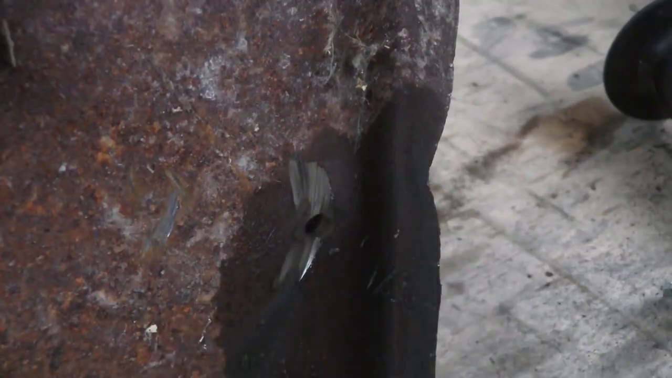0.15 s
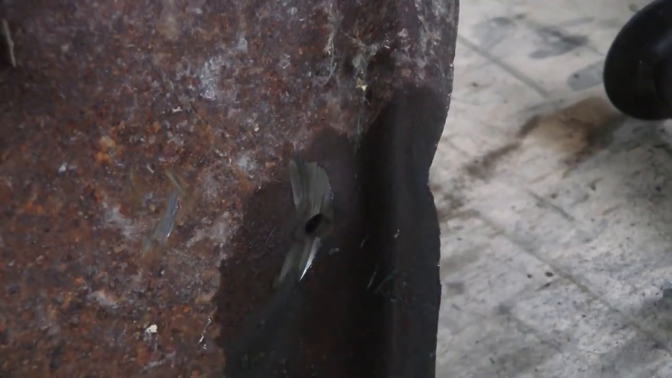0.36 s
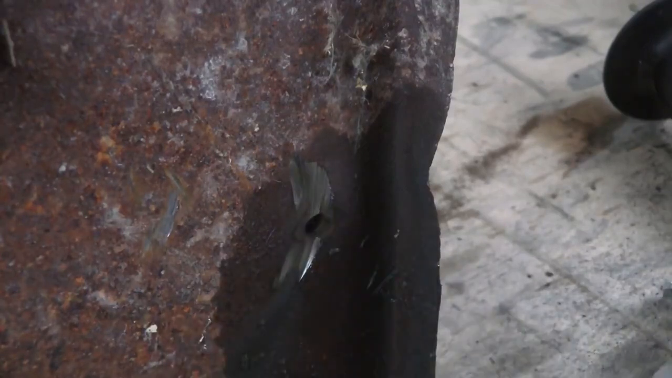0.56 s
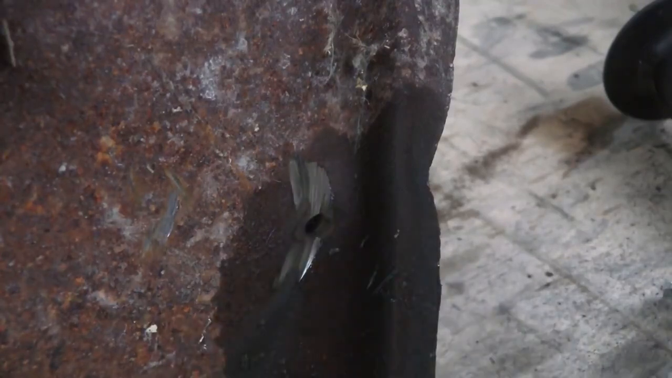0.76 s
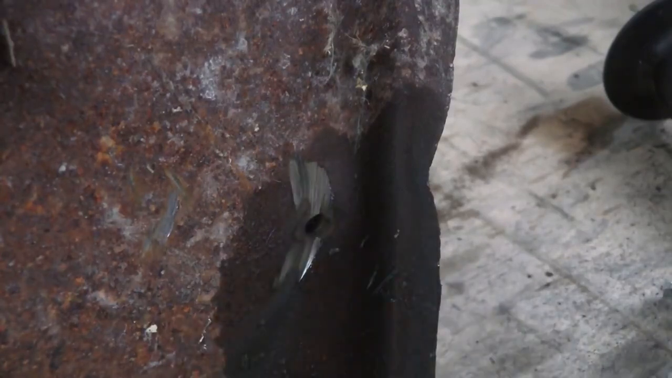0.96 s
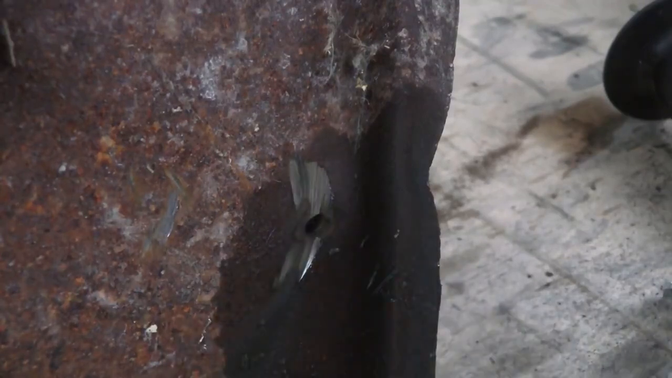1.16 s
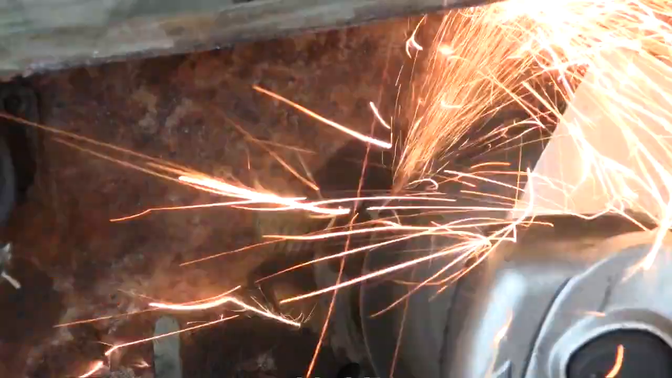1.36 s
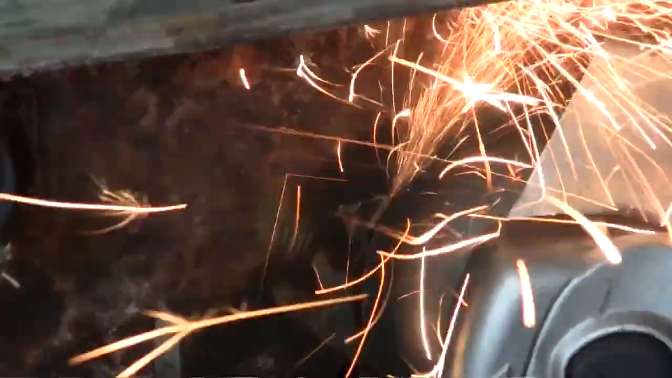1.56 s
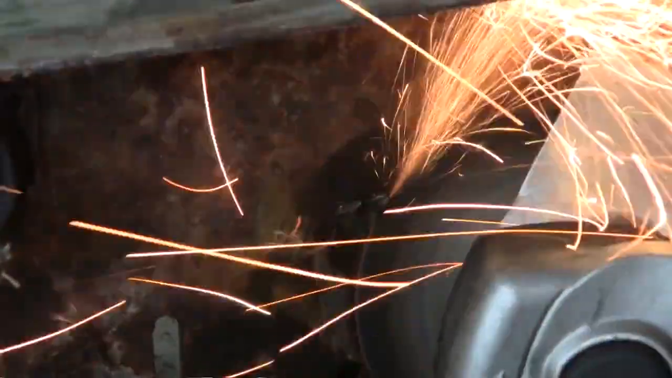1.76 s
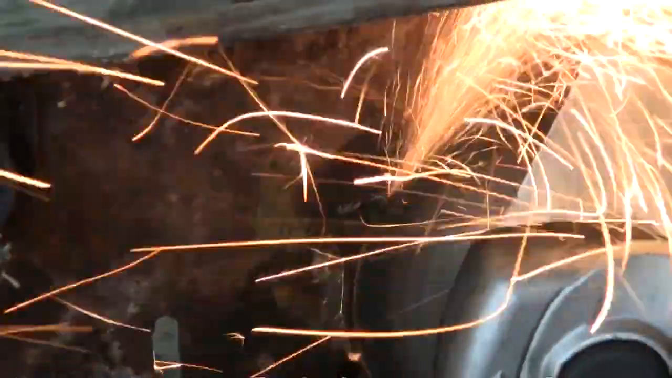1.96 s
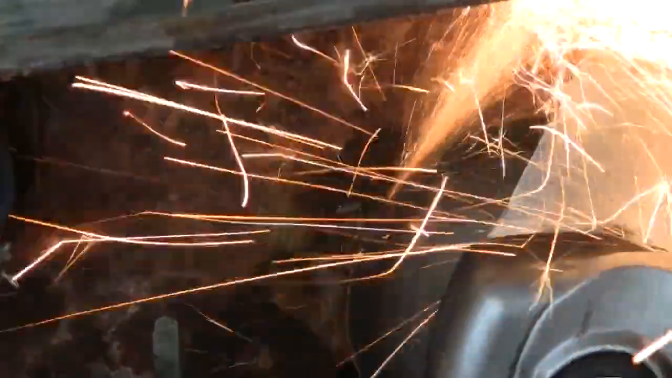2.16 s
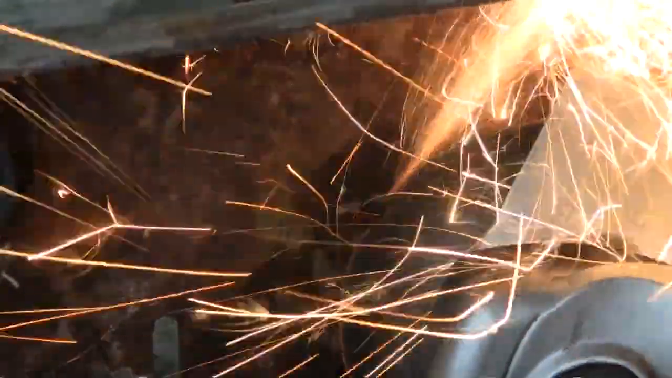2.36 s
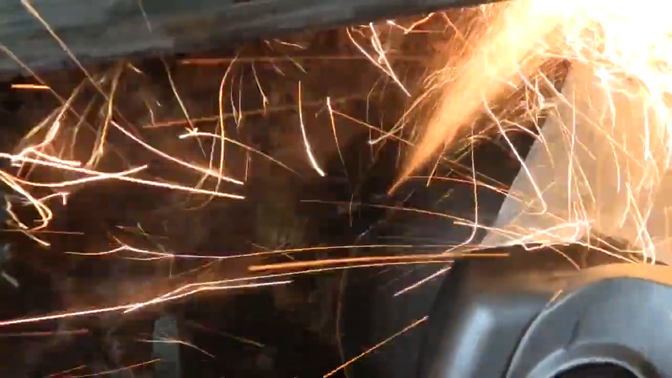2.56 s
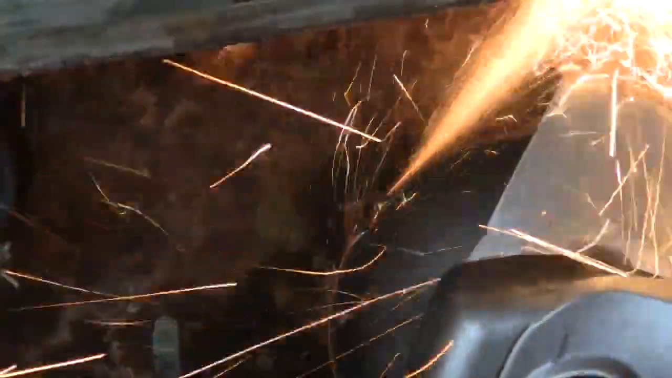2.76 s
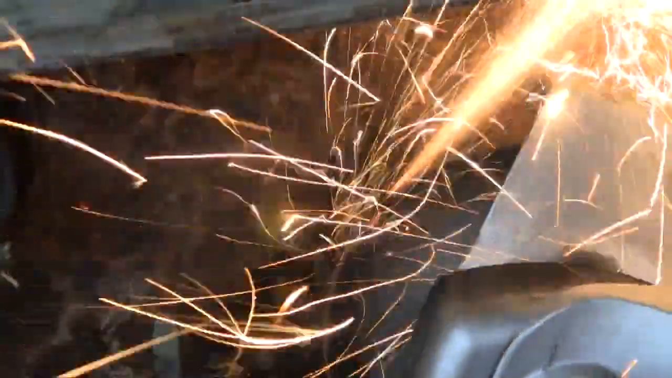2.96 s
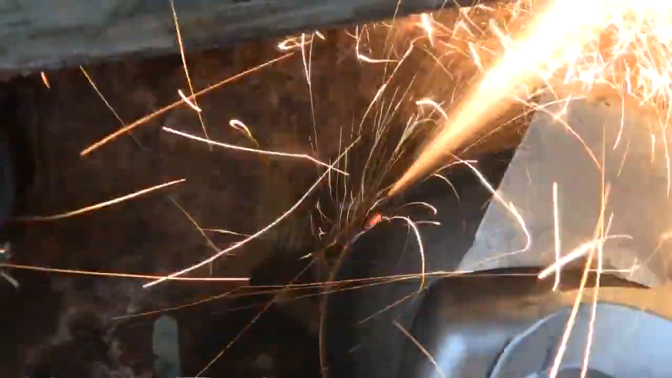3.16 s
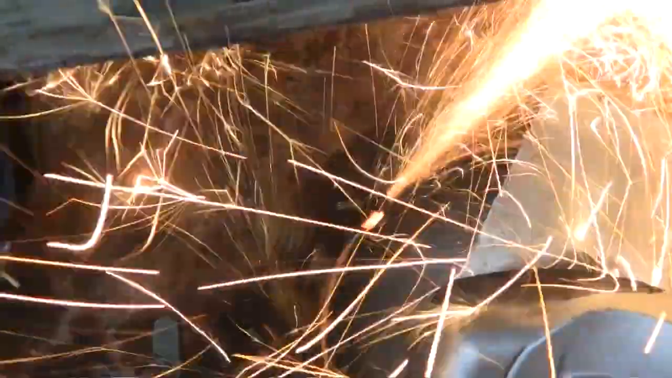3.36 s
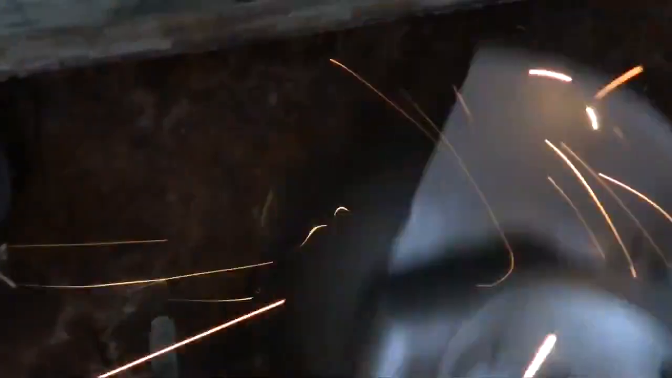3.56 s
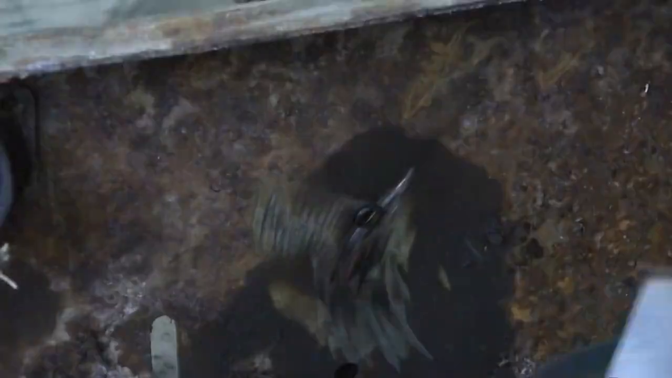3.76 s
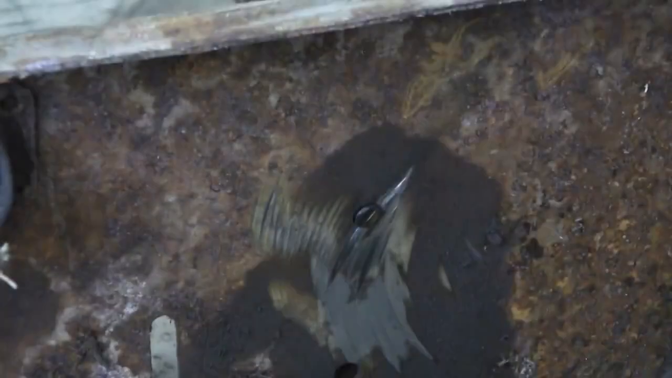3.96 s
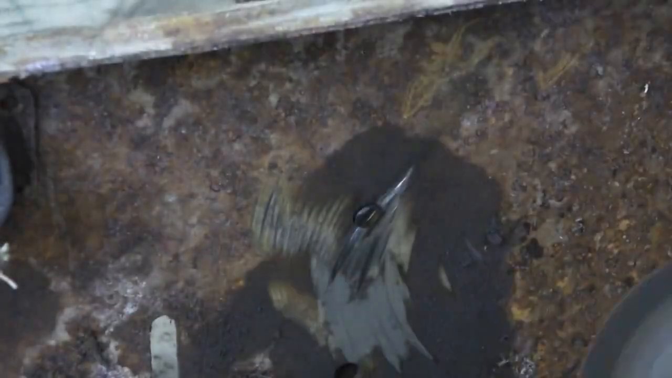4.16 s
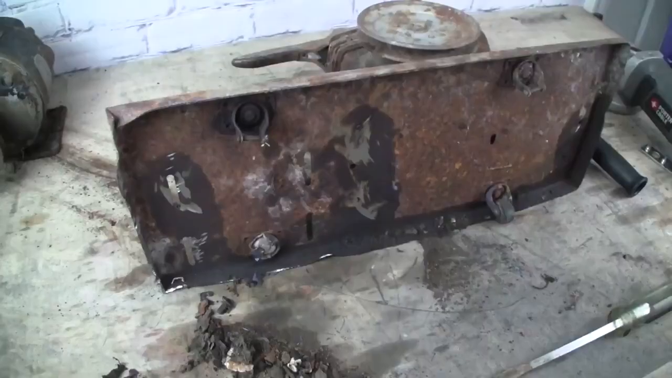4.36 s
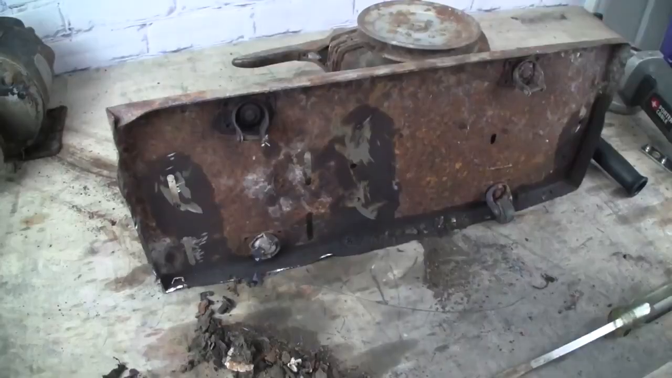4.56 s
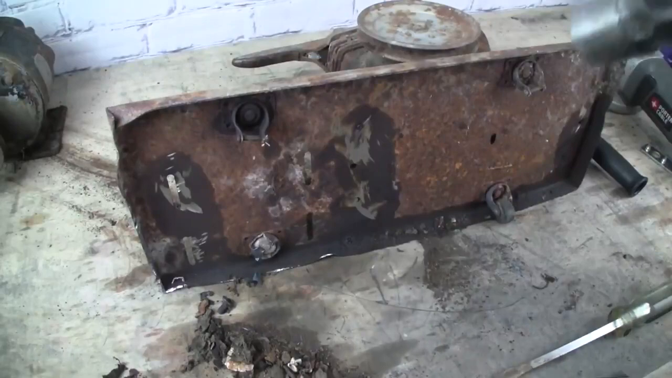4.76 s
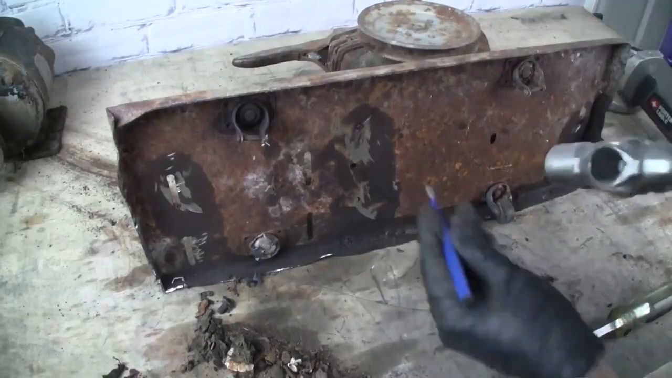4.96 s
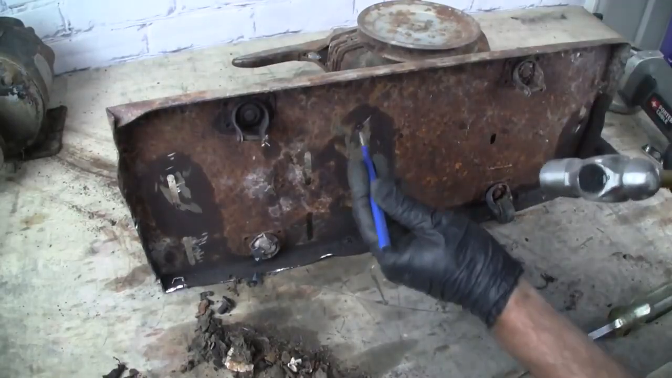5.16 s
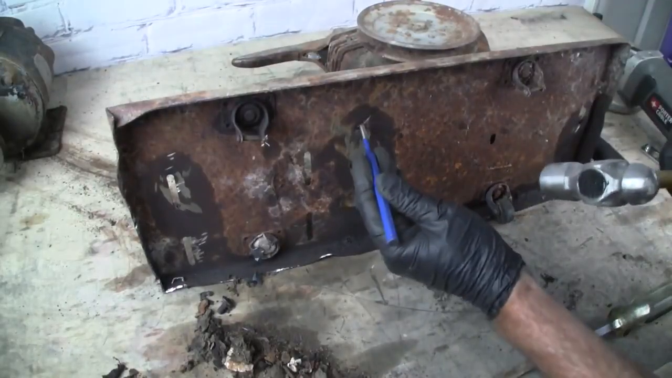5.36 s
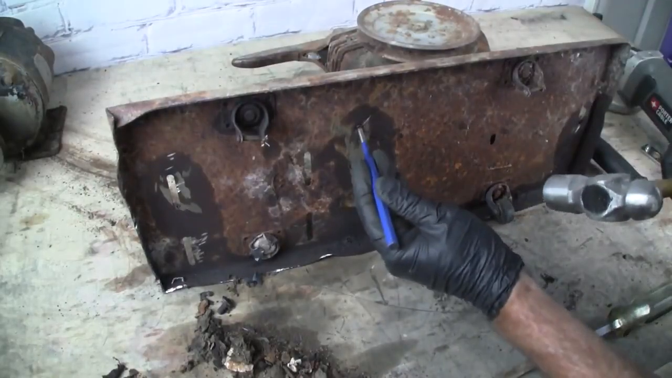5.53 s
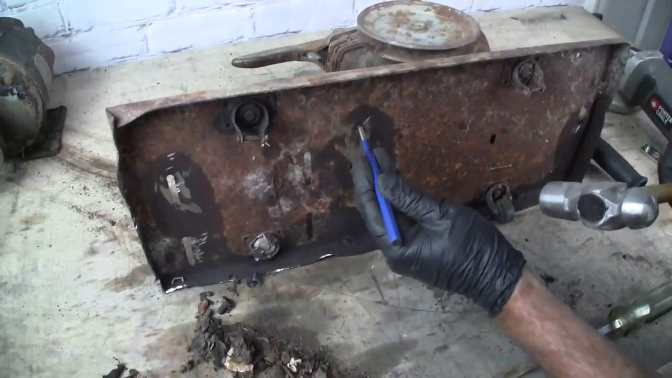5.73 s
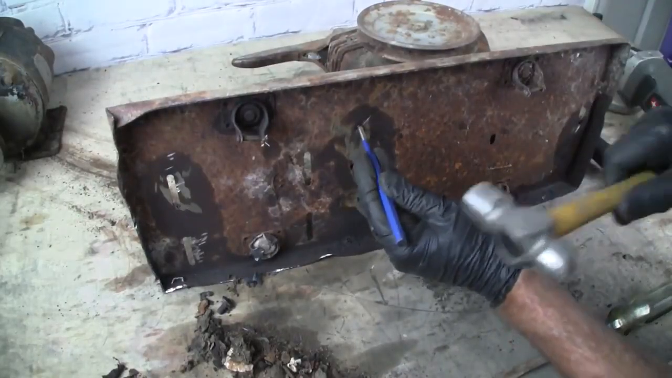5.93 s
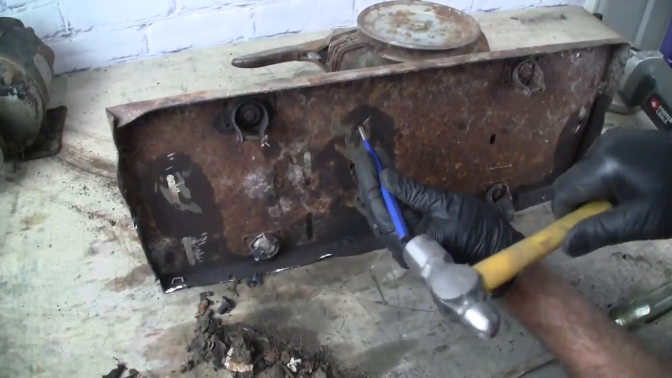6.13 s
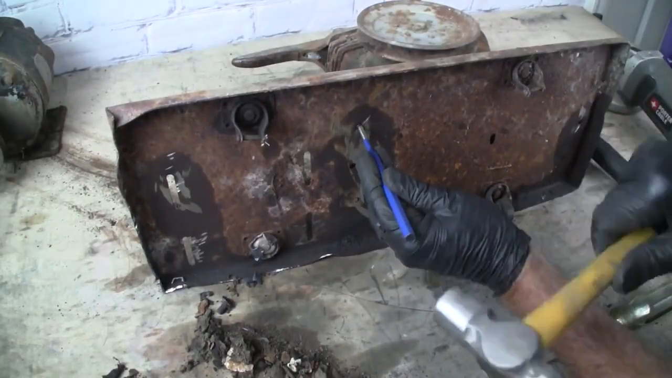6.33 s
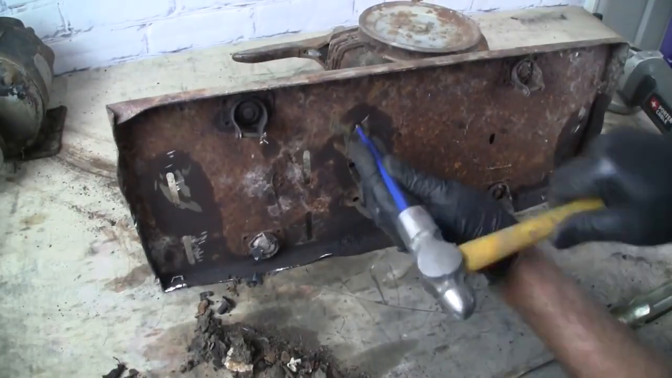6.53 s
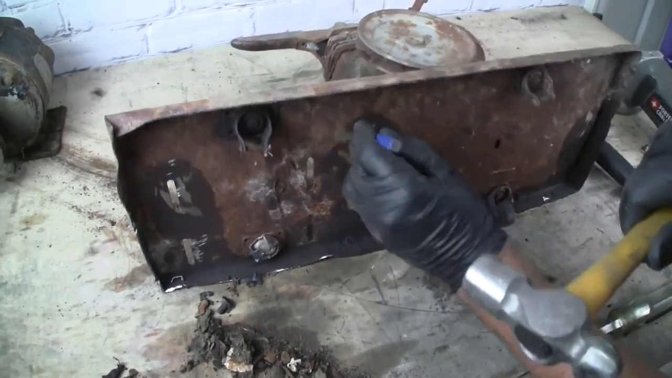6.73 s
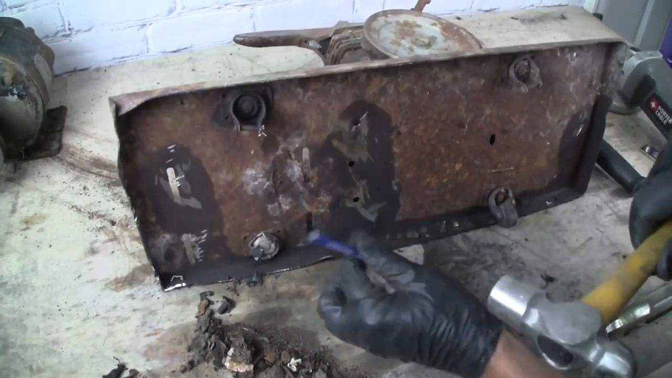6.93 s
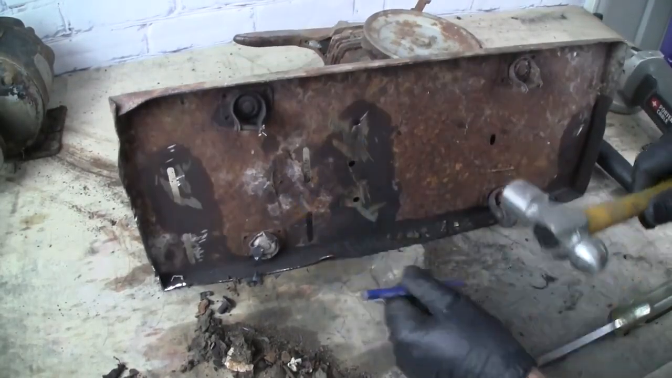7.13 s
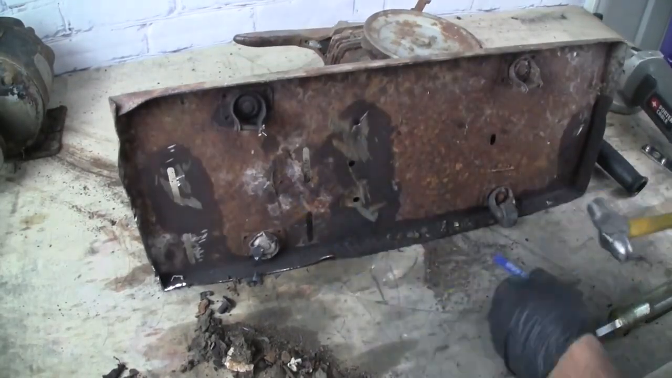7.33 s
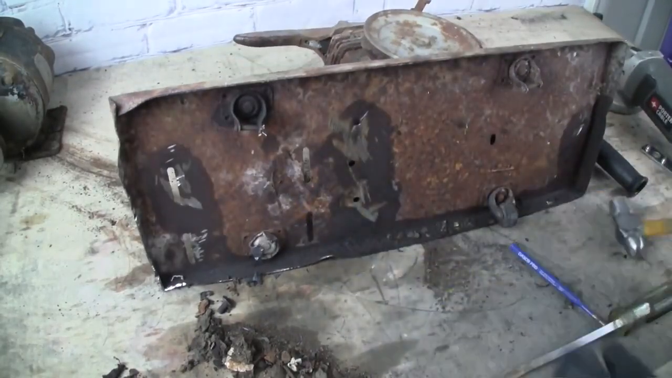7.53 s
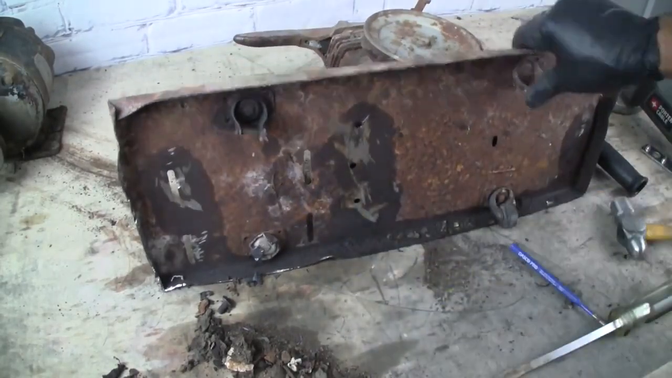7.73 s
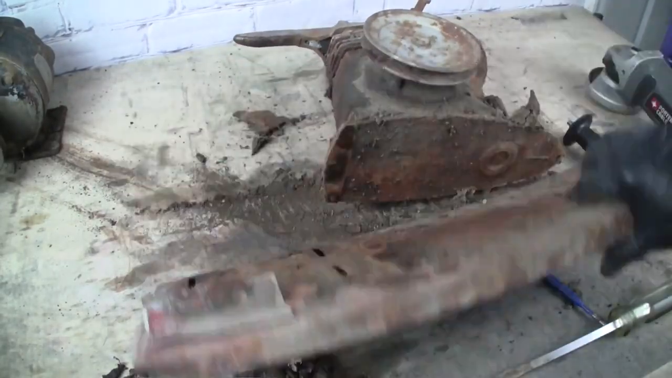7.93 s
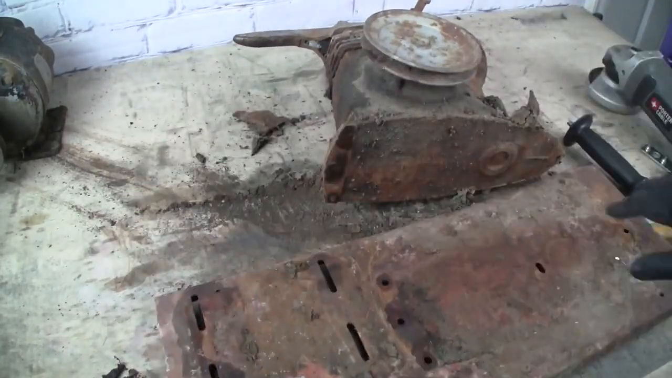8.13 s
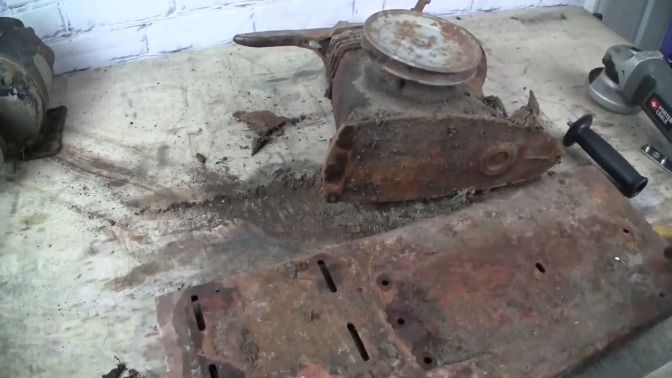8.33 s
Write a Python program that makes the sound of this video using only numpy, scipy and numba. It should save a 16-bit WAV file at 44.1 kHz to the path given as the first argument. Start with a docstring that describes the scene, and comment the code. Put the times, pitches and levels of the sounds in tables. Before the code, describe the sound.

In a quiet workshop a tool thuds down, an angle grinder screeches on rusty steel and stops dead, then hammer blows and clattering metal.

```python
"""In a quiet workshop, a tool is laid down, then an angle grinder cuts into rusty steel for three seconds.
It starts and stops abruptly: grit scratches, partly repeated each turn, become ring, whine, drone and hiss.
After the grinding a punch is hammered, the plate shifts, tools are laid down, the plate clatters:
noise bursts stir shared resonances, and sine waves ping. Gloves rustle over a hum, both shaped noise."""
import sys
import numpy as np
from scipy import signal
from scipy.fft import rfft, irfft, next_fast_len
from scipy.io import wavfile
from scipy.ndimage import uniform_filter1d
from numba import njit

SR = 44100
rng = np.random.default_rng(int(sys.argv[2]) if len(sys.argv) > 2 else 0)


def materialize(psi):
    """Save the field psi as 16-bit PCM at rate SR to the path in sys.argv[1].

    A 1-D psi becomes a single channel; in a 2-D psi each row is a channel.
    """
    bounded = np.clip(np.atleast_2d(psi).T, -1, 1)
    quanta = np.round(bounded * 32767).astype(np.int16)
    wavfile.write(sys.argv[1], SR, quanta)


N = 374409
T = np.arange(N) / SR  # time in seconds

# how the plate likes to ring: mode_hz [Hz], width_hz [Hz], level_db over the dense wash [dB]
PLATE_MODES = [(130, 30, 8), (290, 40, 6), (530, 40, 4), (935, 25, 7), (1065, 30, 6), (1210, 30, 4),
               (1450, 40, 6), (1530, 40, 6), (1950, 30, 5), (2280, 30, 6), (2950, 50, 7), (3250, 50, 6),
               (3380, 40, 6), (3550, 50, 7), (3780, 40, 5), (4230, 50, 4), (4630, 50, 5)]
# tone of knocks and drags: pitch_hz [Hz], level_db for each Hz [dB]
KNOCK_TONE = [(40, -8), (110, -2.5), (250, -1), (1500, -7.5), (3400, -10), (9000, -16), (11500, -17.5),
              (16000, -40)]
# stereo width of knocks and drags: pitch_hz [Hz], side_minus_mid_db [dB]
KNOCK_WIDTH = [(100, -29), (1300, -12), (4400, -9), (8000, -4.5), (15000, 4.5)]
# stereo width of hum and rustle: pitch_hz [Hz], side_minus_mid_db [dB]
QUIET_WIDTH = [(60, -5), (400, 4), (4400, -4.5), (15000, -1.5)]


def undb(db):
    """Turns decibels into a plain multiplier."""
    return 10 ** (np.asarray(db) / 20)


def unit(x):
    """Scales a sound to an rms of 1."""
    return x / np.sqrt(np.mean(x ** 2))


def on_log(table, hz):
    """Reads a (Hz, value) table on a log-frequency axis."""
    table_hz, values = np.array(table).T
    return np.interp(np.log(hz + 1), np.log(table_hz), values)


def walk(rate, count):
    """Wandering random levels, held for 1 / rate seconds and smoothed twice; spread near 1."""
    hold = int(SR / rate)
    steps = np.repeat(rng.standard_normal(count // hold + 1), hold)
    return 1.27 * uniform_filter1d(uniform_filter1d(steps, hold), hold)[:count]


def grit(spread_db, count):
    """Mid and side streams of tiny impacts of uneven size."""
    size = np.minimum(rng.exponential(size=count), 5)
    return unit(rng.standard_normal((2, count)) * undb(spread_db * size))


def split(mid_side, tone, stereo_width, edges_hz):
    """Colours a mid/side pair, makes it left/right and yields overlapping bands peaking at inner edges."""
    count = mid_side.shape[1]
    hz = np.fft.rfftfreq(count, 1 / SR)
    mid, side = rfft(mid_side) * undb(on_log(tone, hz))
    side = side * undb(on_log(stereo_width, hz))
    for low, peak, high in zip(edges_hz, edges_hz[1:], edges_hz[2:]):
        mask = np.interp(np.log(hz + 1), np.log([low, peak, high]), [0, 1, 0])
        yield peak, irfft(np.array([mid + side, mid - side]) * mask, count)


def zone(mid_side, tone, stereo_width, low_hz, high_hz):
    """One steep-edged stereo band of rms 1."""
    _, lower = next(split(mid_side, tone, stereo_width, (low_hz * .85, low_hz, high_hz)))
    _, upper = next(split(mid_side, tone, stereo_width, (low_hz, high_hz, high_hz * 1.15)))
    return unit(lower + upper)


@njit
def turns(x, lag, share):
    """Feeds each disc turn's pattern of scratches into the next turn; lag is a turn in samples."""
    y, past = np.zeros(len(x)), 0.
    for i in range(len(x)):
        k = int(lag[i] - .5)
        if i > k:  # an all-pass supplies the fraction of a sample
            past = (1 - lag[i] + k) / (1 + lag[i] - k) * (y[i - k] - past) + y[i - k - 1]
        y[i] = np.sqrt(1 - share[i] ** 2) * x[i] + share[i] * past
    return y


@njit
def moving_resonance(x, hz, width):
    """Band-pass whose centre and width move, gain 1 at the centre."""
    y, band, low = np.empty(len(x)), 0., 0.
    for i in range(len(x)):
        g, k = np.tan(np.pi * hz[i] / SR), width[i] / hz[i]
        v = (band + g * (x[i] - low)) / (1 + g * (g + k))
        band, low, y[i] = 2 * v - band, low + 2 * g * v, k * v
    return y


def workshop_hum():
    """Far machines and air: noise whose bands swell separately under a slow overall level."""
    # hum loudness: time_s [s], level_db [dB]
    loudness = [(0, -47.5), (.1, -55.5), (1.37, -56), (4.4, -51.5), (4.8, -57.5), (4.94, -51.5),
                (5.05, -54), (5.55, -55), (5.85, -60), (6.05, -54), (7.1, -63), (7.3, -51), (8.38, -54.5),
                (8.49, -54)]
    # hum tone: pitch_hz [Hz], level_db for each Hz [dB]
    hum_tone = [(25, -24), (90, -13.5), (140, -5), (390, -3), (670, -1), (1120, -6), (2460, -13),
                (14000, -29.5)]
    time_s, level_db = np.transpose(loudness)
    hum = 0
    for _, band in split(rng.standard_normal((2, N)), hum_tone, QUIET_WIDTH, 20 * 2 ** np.arange(0, 10, .5)):
        hum = hum + undb(1.5 * walk(4.5, N)) * band
    return unit(hum) * undb(np.interp(T, time_s, level_db))


def rustle():
    """Gloves and sleeves brush: short swells of crackly noise."""
    # each brush: middle_s [s], level_db [dB]
    brushes = [(1.02, -57), (1.12, -56.5), (4.458, -55), (4.617, -54), (4.745, -58.5), (4.88, -57.5),
               (5.212, -56.5)]
    # cloth tone: pitch_hz [Hz], level_db for each Hz [dB]
    cloth_tone = [(1000, -32), (2500, -4), (4000, 0.5), (6000, -5), (9000, 0.5), (12000, -11),
                  (15000, -22.5)]
    brush_s = 0.026  # from the middle until the swell falls to about a third
    cloth = zone(grit(4.8, N), cloth_tone, QUIET_WIDTH, 1200, 14000) * undb(2.0 * walk(74, N))
    return cloth * sum(undb(db) * np.exp(-((T - at) / brush_s) ** 2) for at, db in brushes)


def punch():
    """Two modes of the steel rod ping when tapped or rolling, dying fast in the glove or on the concrete."""
    # each ping: start_s [s], low_mode_db [dB], high_mode_db relative to low [dB]
    pings = [(5.455, -50, -23), (5.7036, -50, -18), (7.422, -50, -1), (7.4744, -41, -5), (7.5078, -49, 9),
             (7.529, -45, 11.5), (7.5472, -46, 6), ]
    low_hz, high_hz = 4170, 8850
    held_t60_s, free_t60_s, let_go_s = .042, .075, 7.4  # the glove stills it sooner
    out = np.zeros(N)
    for start_s, low_db, high_db in pings:
        since = np.maximum(T - start_s, 0)
        t60_s = held_t60_s if start_s < let_go_s else free_t60_s
        shape = np.minimum(since / 0.0036, 1) * undb(low_db - 60 * since / t60_s)
        high = undb(high_db) * np.sin(2 * np.pi * high_hz * since)
        out += shape * (np.sin(2 * np.pi * low_hz * since) + high)
    return out


def drags():
    """Stick-slip of heavy plate on concrete: a lumpy rumble and a gritty scrape."""
    # each drag: loudest_s [s], rise [dB/s], fall [dB/s], rumble_db [dB], scrape_db relative to rumble [dB]
    drag_moves = [(6.836, 84, 105, -33.5, 1), (7.612, 119, 120, -35, -9.5), (7.87, 256, 48, -54.5, 18)]
    noise = grit(3.7, N)
    rumble = zone(noise, KNOCK_TONE, KNOCK_WIDTH, 90, 1400) * undb(3.5 * walk(60, N))
    scrape = zone(noise, KNOCK_TONE, KNOCK_WIDTH, 880, 11400) * undb(3.3 * walk(90, N))
    out = 0
    for loudest_s, rise, fall, rumble_db, scrape_db in drag_moves:
        swell_db = np.minimum(rise * (T - loudest_s), fall * (loudest_s - T))
        out = out + undb(rumble_db + swell_db) * (rumble + undb(scrape_db) * scrape)
    return out


def singing():
    """Blows on plate and laid-down tools give short, fading, beating tones, pitched from the shared mode table."""
    # each blow: start_s [s], t60_s [s], then pairs of (mode_hz [Hz], level_db [dB])
    sung_blows = [(.613, 0.063, (290, -13.5), (130, -20.5)), (.6135, 0.028, (1530, -19.5), (1950, -23)),
                  (6.116, .1, (2280, -40)), (6.187, 0.088, (1210, -19.5), (1530, -29)),
                  (6.328, 0.074, (1065, -16), (3380, -20), (3780, -20), (4630, -22)),
                  (6.36, 0.094, (1530, -25.5)), (6.464, .08, (3380, -17), (1450, -25)),
                  (6.6, .1, (2950, -19.5), (3380, -20.5), (1950, -24)), (6.84, 0.086, (2950, -20),
                  (3550, -18)), (6.895, 0.086, (290, -19.5)), (7.42, 0.065, (530, -26)),
                  (7.516, .02, (935, -7), (530, -10.5)), (7.599, 0.051, (290, -12)),
                  (7.65, 0.066, (290, -16.5)), (8.087, .06, (3380, -11), (3250, -15)),
                  (8.115, 0.14, (1450, -17.5), (935, -21), (3250, -21)), (8.216, .17, (935, -17))]
    rise_s, flutter_db = .0015, 2.5  # loose parts damp the ring unevenly
    out = np.zeros(N + SR)
    t = np.arange(SR // 2) / SR
    modes_hz = np.array(PLATE_MODES)[:, 0]
    for start_s, t60_s, *partials in sung_blows:
        i = int(start_s * SR)
        for wanted_hz, level_db in partials:
            hz = modes_hz[np.argmin(abs(modes_hz - wanted_hz))]
            phase, apart = rng.random(2)
            neighbour = np.sin(2 * np.pi * (hz * (1.01 + .01 * apart) * t + phase))
            pair = np.sin(2 * np.pi * hz * t) + .4 * neighbour
            out[i:i + len(t)] += pair * np.minimum(t / rise_s, 1) * undb(level_db - 60 * t / t60_s)
    return out[:N] * undb(flutter_db * walk(90, N))


def knocks():
    """Each blow rattles briefly in four registers and leaves a wash; both stir the shared resonances."""
    # each blow: start_s [s], crack_db around 2.5-6 kHz [dB], thud_db and clank_db relative to crack [dB],
    # contact_s, 60 dB fall time before each register stretches it [s], ring_db relative to blow [dB]
    blows = [(0.612, -27, 5.5, 11.5, 0.034, -24), (0.6283, -27.5, 5, -1, 0.054, -21),
             (0.6588, -31, -15, -3, 0.037, -10.5), (0.7266, -38.5, 3.5, -7, 0.055, -21),
             (0.7497, -43.5, -12, -10, .026, -9), (5.2686, -34, -24, 2.5, 0.023, -14),
             (5.3274, -34.5, -15, 6.5, 0.038, -28), (5.522, -49.5, -1, -3, 0.033, -25),
             (5.614, -55, 5, 20, 0.03, -22), (5.6662, -51, -6, 9, 0.024, -12),
             (5.695, -51, -2, -4, 0.045, -22), (6.116, -34.5, -11, 7.5, 0.018, -14),
             (6.1856, -18, -49, -2, 0.049, -18), (6.3273, -7, -19, -4.5, 0.039, -15),
             (6.4635, -7.5, -24.5, -13.5, 0.039, -10.5), (6.5989, -11, -22, -8.5, 0.041, -5.5),
             (6.765, -20.5, 8, 6, 0.024, -28), (6.7825, -15.5, -20, -5, 0.031, -20),
             (6.808, -24, -19, 7, 0.032, -21), (6.8398, -12, -11.5, -23, 0.059, -9.5),
             (6.8945, -33, 15.5, 13.5, 0.22, -20), (6.918, -37, 10, 15, .04, -25),
             (6.9845, -43, 11.5, 15, 0.053, -22), (7.0504, -38, -29, -31, 0.067, -19),
             (7.4202, -30, -7, 4.5, 0.026, -3), (7.4839, -44, 9, 21, 0.065, 2.5),
             (7.5151, -37.5, 15, 21, 0.045, -25), (7.5478, -23.5, 9, 4, 0.027, -30),
             (7.5981, -23, 17, 11.5, 0.026, -15), (7.6495, -24.5, 12, 2, 0.043, -8),
             (7.7857, -33.5, -23, 6, 0.03, -11), (7.8064, -41, -25, 14, 0.02, -16),
             (7.8279, -20.5, -19, -9, 0.079, -13), (7.8435, -14.5, -36, -37, 0.054, -12),
             (7.9504, -21.5, -22, -5, 0.078, -21), (7.9828, -26.5, -6, -19, 0.03, -11),
             (8.071, -32, -8, 5.5, 0.098, -14), (8.085, -10, -20, -4, 0.032, -10.5),
             (8.092, -11, -20, -4, 0.033, -15), (8.1143, -19, -11, 1.5, 0.072, -1),
             (8.2077, -34.5, 17.5, 10, .012, -25), (8.2143, 0.5, -30, -9, 0.015, -21.5),
             (8.246, -27, -13, 7, 0.028, -21), (8.4293, -42.5, 9, 1, 0.046, -11)]
    # times when blows land on the free plate: from_s [s], to_s [s], stir_db of its resonances [dB]
    plate_spans = [(6.1, 6.3, -7), (6.3, 6.7, -7), (6.83, 6.85, -5), (7.94, 8.3, -3)]
    # a hand or the floor stills the plate: time_s [s]
    stilled_s = [6.26, 6.92, 7.04, 7.70, 8.05, 8.31]
    still_db_per_s = 390
    plate_t60_s, tool_t60_s = 0.43, 0.31  # blows on the free plate; tools and other contacts
    tool_stir_db, tool_tick_db = -14, -1.5  # other contacts stir the resonances less and have less top
    count = SR // 2
    t = np.arange(count) / SR
    hz = np.fft.rfftfreq(count, 1 / SR)
    modes = np.array([undb(db) / (1 + 2j * (hz - mode_hz) / width) for mode_hz, width, db in PLATE_MODES])
    edges_hz = (60, 260, 1200, 3700, 8500, 16000)
    rattle, ringing = (
        [unit(band) for _, band in split(grit(spread_db, N), KNOCK_TONE, KNOCK_WIDTH, edges_hz)]
        for spread_db in (1.0, 1.34))
    out = np.zeros((2, N + count))
    for start_s, crack_db, thud_db, clank_db, contact_s, ring_db in blows:
        on_plate = [db for a, b, db in plate_spans if a < start_s < b]
        # top register: light contacts are relatively brighter; heavy, thudding knocks have less top
        tick_db = -3.5 - 0.1292 * crack_db - 0.6 * max(thud_db, 0) + (0 if on_plate else tool_tick_db)
        t60_s = plate_t60_s if on_plate else tool_t60_s
        i, j = int(start_s * SR), int(rng.random() * (N - count))  # j picks a random piece of noise
        # (dB, slowness of the blow, dB and slowness of the wash): lows come late and stay
        registers = ((thud_db, 2.5, 2.5, 1.2), (clank_db, 1.4, 2.5, 1.3), (0, 1, 0, 1), (tick_db, .9, -4, .75))
        hit, tail = 0, 0
        for blow, wash, (part_db, slow, wash_db, linger) in zip(rattle, ringing, registers):
            rise = undb(crack_db + part_db - 9.5) * np.minimum(t / (0.0017 * slow), 1)
            fall = undb(-60 * (t / (contact_s * slow)) ** 1.456)  # holds while the parts chatter
            hit = hit + rise * blow[:, j:j + count] * fall
            wash_fall = undb(ring_db + wash_db - 60 * t / (t60_s * linger))
            tail = tail + rise * wash[:, j:j + count] * wash_fall
        spot_db = rng.uniform(-5, 5, len(PLATE_MODES))  # each blow lands on another spot
        stir = undb(spot_db + (sum(on_plate) if on_plate else tool_stir_db)) @ modes
        # the short blow stirs the resonances less than the lasting wash
        hit_spectrum = rfft(hit) * (1 + 0.7 * stir)
        # a low-pass near 10.8 kHz takes the top off the wash
        tail_spectrum = rfft(tail) * (1 + stir) / (1 + (hz / 10800) ** 6)
        until_stilled = min([d for d in stilled_s if d > start_s] + [N / SR]) - start_s
        damping = undb(-still_db_per_s * np.maximum(t - until_stilled, 0))
        out[:, i:i + count] += irfft(hit_spectrum + tail_spectrum, count) * damping
    return out[:, :N]


def scratches(t, lag, share, drone_db, hiss_db, skip_s):
    """Grit scratches that partly repeat each turn ring the disc, drone in the plate and hiss."""
    # grinding tone before its three parts are levelled: pitch_hz [Hz], level_db for each Hz [dB]
    grind_tone = [(30, -42), (163, -23.5), (345, -18.5), (529, -9), (630, -12), (1370, -9), (2000, -11),
                  (2600, -8), (3600, -3), (4500, -7.5), (5000, -9), (7360, -8), (10400, -6.5),
                  (12500, -18.5), (14500, -25), (16000, -46)]
    # grinding stereo width: pitch_hz [Hz], side_minus_mid_db [dB]
    grind_width = [(60, -10), (300, -6.5), (2400, -12), (4400, -9.5), (8000, -7), (15000, 0)]
    drone_left_db = 1.16  # the drone leans left
    count = len(t)
    scratch = np.array([turns(x, lag, .4 * share) for x in grit(1.5, count)])
    parts = {"drone": 0, "ring": 0, "hiss": 0}
    for hz, band in split(scratch, grind_tone, grind_width, 30 * 2 ** np.arange(0, 9.3, 1 / 5)):
        name = "drone" if hz < 2300 else "ring" if hz < 5000 else "hiss"
        # after the skip the low drone is stronger, its bass weaker
        growl_db = np.interp(hz, (200, 282, 800, 900), (-7, 1, 1.5, -0.5))
        band = band * undb(growl_db * (t > skip_s))
        flicker_db = (1 - share / 2) * (walk(5, count) + walk(25, count))
        parts[name] = parts[name] + undb(flicker_db) * band
    lean_db = drone_left_db * np.array([[.5], [-.5]])
    drone = unit(parts["drone"]) * undb(drone_db + lean_db)
    return unit(parts["ring"]) * undb(-1) + drone + unit(parts["hiss"]) * undb(hiss_db)


def disc_whine(lag, share, low_hz, high_hz, low_db, high_db):
    """Narrow disc resonances slide with the angle of contact and keep most of the turn pattern."""
    count = len(lag)
    mid, side = (turns(x, lag, share) for x in grit(2.8, count))
    width = np.interp(share, (0, 1), (320, 400))  # Hz, for a loose and a steady hand
    # a third, broader ridge, strengthened by steady pressure
    treble = 7280 + 0 * lag, -19.5 + 7 * np.minimum(2 * share, 1), 1.4
    sound = 0
    for hz, db, broad in ((low_hz, low_db, 1), (high_hz, low_db + high_db, 1), treble):
        hz = hz * (1 + .013 * (1 - share) * walk(16, count))
        ridge = []
        for x in (mid + side / 5, mid - side / 5):
            once = moving_resonance(x, hz, broad * width)
            ridge.append(moving_resonance(once, hz, broad * width))
        sound = sound + unit(np.array(ridge)) * undb(db + 1.6 * (1 - share) * walk(20, count))
    # the guard's thin whine follows a multiple of the disc turns
    hz = 72 * SR / lag * (1 + .008 * walk(3, count))
    guard = []
    for x in (mid + side / 2, mid - side / 2):
        guard.append(moving_resonance(moving_resonance(x, hz, width), hz, width))
    return sound + unit(np.array(guard)) * undb(-18 + 3 * walk(4, count))


def skip_thump(t, skip_s):
    """The disc skips and thumps the plate: one short, low, fading sine."""
    since = np.maximum(t - skip_s, 0)
    shape = undb(-20 - 60 * since / 0.058) * np.minimum(since / 0.0042, 1)
    return shape * np.sin(2 * np.pi * 254 * since)


def grinder():
    """The spinning disc on the plate: scratches and whine under a bouncing hand, cut off sharply at both ends."""
    # grinding: time_s [s], ring_db [dB], low_ridge_hz [Hz], high_ridge_hz [Hz],
    # low_ridge_db relative to ring [dB], high_ridge_db relative to low ridge [dB]
    grinding = [(1.41, -21, 4100, 4400, -1.5, -8.5), (1.49, -20, 3520, 4100, -1.5, -1.5),
                (1.6, -18.5, 3140, 3950, -3.5, -1), (1.8, -17, 3620, 3900, -7.5, 0),
                (1.95, -17, 2960, 3800, -10.5, -1), (2.3, -17.5, 3090, 4080, -11, -0.5),
                (2.7, -17.5, 2940, 3620, -8, 0), (2.87, -17, 3190, 3660, -5, -1.5),
                (3.54, -17, 3080, 3540, -6, 0), (3.64, -19.5, 2900, 3850, -8, 2.5),
                (3.76, -17, 2700, 4200, -10, 4.5), (3.9, -18, 2600, 3900, -8, 0),
                (4.12, -19.5, 2710, 3800, -6, -0.5), (4.3, -20, 2940, 4200, -7, -2)]
    # steady pressure: time_s [s], turn_hz [turns per second], share of grit pattern returning each turn [0-1]
    spin = [(1.9, 142, 0), (2.1, 143.6, .5), (2.7, 143, .5), (2.9, 140, .94), (3.56, 134.8, .92),
            (3.64, 136, 0)]
    on_s, off_s, skip_s = 1.3825, 4.377, 3.625
    a, b = int(on_s * SR), int(off_s * SR)
    count = next_fast_len(b - a)
    t = on_s + np.arange(count) / SR
    time_s, *columns = np.transpose(grinding)
    ring_db, low_hz, high_hz, low_db, high_db = (np.interp(t, time_s, column) for column in columns)
    # the drone grows as the disc bites deeper; the spark hiss thins as the rust is ground off
    drone_db = -26 + 0.15 * (t - on_s) - ring_db
    hiss_db = -19.5 - 1.55 * (t - on_s) - ring_db
    spin_s, turn_hz, share = np.transpose(spin)
    lag, share = SR / np.interp(t, spin_s, turn_hz), np.interp(t, spin_s, share)
    sound = scratches(t, lag, share, drone_db, hiss_db, skip_s)
    sound = sound + disc_whine(lag, share, low_hz, high_hz, low_db, high_db)
    # the hand bounces on the work, less so under steady pressure
    sound = sound * undb(ring_db + 1.2 * (1 - share) * walk(30.03, count))
    sound = sound + skip_thump(t, skip_s)
    out = np.zeros((2, N))
    out[:, a:b] = sound[:, :b - a]
    return out


def scene():
    """Adds the grinder to the quiet sounds and handwork, which sit a little left of centre."""
    left_db = 0.86
    hands = workshop_hum() + rustle() + punch() + drags() + singing() + knocks()
    return hands * undb(np.array([[left_db], [-left_db]]) / 2) + grinder()


def record(dry):
    """A steep low-pass cuts the top above 15600 Hz."""
    return signal.sosfilt(signal.ellip(10, .2, 80, 15600, fs=SR, output="sos"), dry)


dry = scene()
out = record(dry)
materialize(out)
```